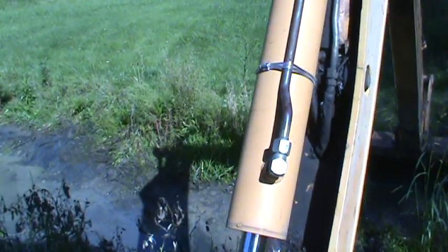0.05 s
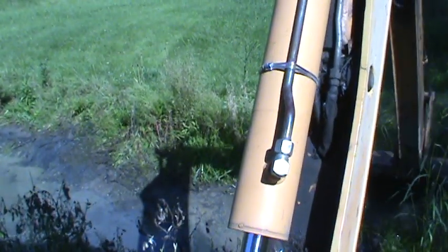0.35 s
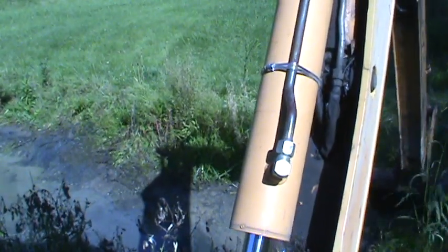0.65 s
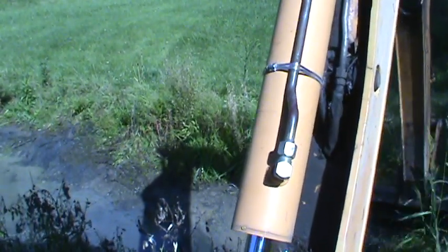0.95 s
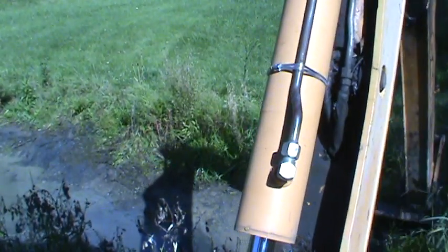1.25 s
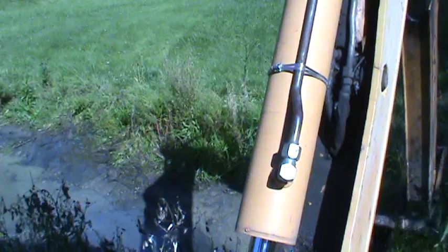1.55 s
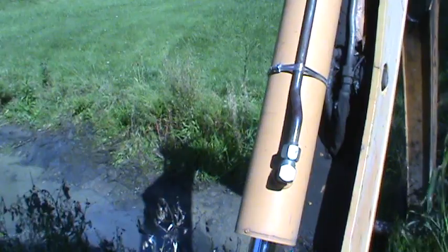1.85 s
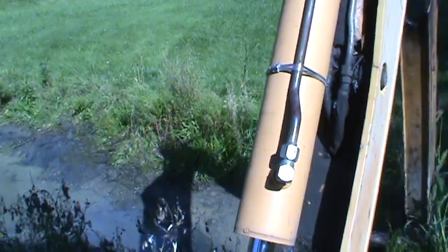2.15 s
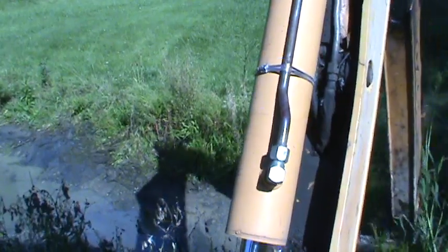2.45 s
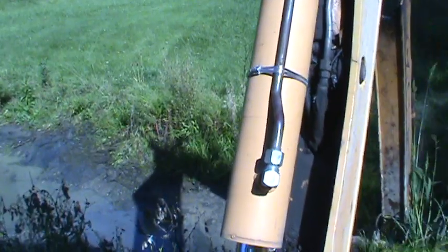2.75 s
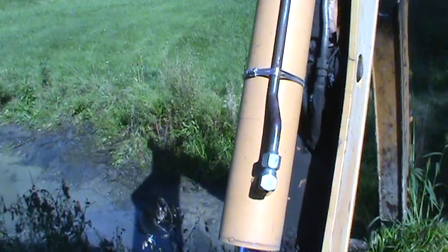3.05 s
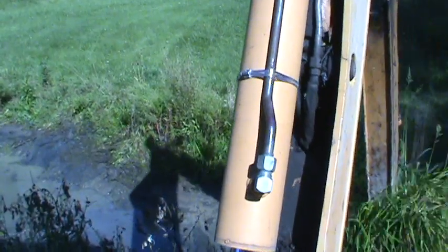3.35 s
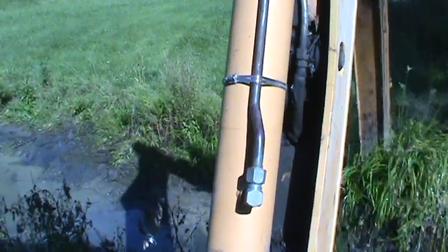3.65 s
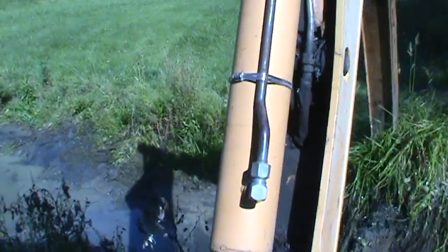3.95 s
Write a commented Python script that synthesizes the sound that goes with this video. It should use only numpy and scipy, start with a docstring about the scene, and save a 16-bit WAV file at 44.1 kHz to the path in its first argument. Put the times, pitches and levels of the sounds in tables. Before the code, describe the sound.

Diesel digger engine throbbing and whining steadily while its arm clanks and scrapes through mud.

```python
"""A four-cylinder diesel throbs and clatters, heard from the seat of a backhoe working a muddy ditch.
Each firing puffs and knocks; the engine turns whirring gears and an oil pump whose teeth whine.
Slack joints in the digging arm clank, a pivot squeals, wet mud drops and wind nudges the microphone.
Near the end the engine labours while oil rushes through a valve and the bucket tears grass."""
import sys
import numpy as np
from scipy import signal
from scipy.fft import rfft, irfft
from scipy.io import wavfile
from scipy.ndimage import map_coordinates

SR = 44100
rng = np.random.default_rng(int(sys.argv[2]) if len(sys.argv) > 2 else 0)


def to_wav(sig):
    """Store sig (one row per channel, or 1-D mono) as 16-bit WAV at the path in sys.argv[1].

    Samples outside -1..1 are clipped; the rate is SR.
    """
    pcm = np.clip(np.atleast_2d(sig), -1, 1) * 32767
    pcm = np.round(pcm).astype(np.int16)
    wavfile.write(sys.argv[1], SR, pcm.T)  # frames by channels


N = 176400

# Levels are relative. A SPECTRUM says how strong a noise is at each frequency: f/Hz, level/dB.
# wind buffets: peak t/s, half length/s, level/dB
GUSTS = [(0.325, .08, -25), (2.36, 0.14, -29), (3.37, .08, -26)]
WIND_SPECTRUM = [(12, -50), (22, -14), (30, 2), (37, 5), (50, -19), (400, -72)]
# the bucket tearing grass: peak t/s, half length/s, level/dB
TEARS = [(.31, 0.057, -39), (3.62, 0.074, -31), (3.82, 0.41, -32.5)]
GRASS_SPECTRUM = [(2500, -16), (6000, 5), (15000, -6)]
# wet spatters and (second row) the bright crack of a clank: t/s, level/dB, decay/s
SPATTERS_AND_CRACK = [(.123, -28.5, 0.0089), (.193, -20.5, 0.0062), (2.14, -33.5, 0.027),
                      (3.058, -26.5, 0.021), (3.087, -24.5, 0.028), (3.175, -26, 0.057), (3.415, -25, 0.01),
                      (3.467, -26, 0.029)]
SPATTER_AND_CRACK_SPECTRUM = [(1000, -5), (2800, 7.5), (5000, 5.5), (9000, 2), (12000, -1.5), (15500, -12)]
# the bucket scraping stony mud: peak t/s, half length/s, level/dB
SCRAPES = [(.24, 0.062, -25), (3.27, 0.24, -28)]
SCRAPE_SPECTRUM = [(400, -14.5), (900, -1), (1600, -9), (2300, -3), (3200, -11.5), (6000, -30),
                   (14000, -35)]
# a heavy clod landing: t/s, level/dB, decay/s
THUDS = [(2.185, -15.5, 0.12)]
THUD_SPECTRUM = [(200, -19), (360, -11), (440, 6), (520, -7), (700, -19), (9000, -78)]
# lumps falling into water: t/s, starting f/Hz, level/dB, decay/s
PLOPS = [(2.183, 1300, -17, 0.011), (2.849, 2170, -16, 0.0064), (3.147, 3370, -22, 0.014),
         (3.229, 1560, -20.5, .016), (3.457, 2374, -20, 0.0095)]
# loose fittings: t/s, f/Hz, level/dB, decay/s
PINGS = [(0.035, 2780, -27, .03), (.048, 5200, -33, 0.022), (.805, 12600, -33, 0.0028)]
# clanks of the boom (the digging arm): t/s, level/dB, decay/s
CLANKS = [(.13, -18, 0.019), (.1945, -14.5, 0.013), (.207, -19, 0.022), (.2324, -19, 0.007),
          (.258, -21, 0.022), (3.322, -19, 0.015), (3.457, -32, 0.013)]
CLANK_SPECTRUM = [(200, 3.5), (700, 11), (1400, -3), (2300, -7.5), (3500, -7), (5000, -12), (9800, -18.5),
                  (12000, -42)]
# notes at which the boom's steel rings: f/Hz, level/dB
BOOM_NOTES = [(1430, 3), (1800, -5), (2300, 0), (2480, -6), (2900, -4), (4190, -9), (5020, -10),
              (7740, -10), (9780, -13)]
# squeals and whistles: t/s, length/s, first f/Hz, last f/Hz, level/dB, octave/dB, roughness/share of f
SQUEALS = [(1.508, 0.077, 5200, 5190, -37, -14, 0.0068), (1.583, 0.036, 5200, 5310, -26.5, -15, 0.011),
           (1.603, 0.063, 5350, 5330, -35, 2.5, 0.002), (1.647, 0.048, 5390, 5345, -33.5, -12, 0.013),
           (1.63, 0.044, 5950, 5930, -39, -22, .014), (1.754, .04, 5100, 5060, -41, -10, .012),
           (3.313, 0.07, 5600, 5580, -33.5, -20, 0.0057), (3.341, 0.072, 2230, 2216, -36, -26, 0.0087),
           (3.385, 0.07, 6470, 6550, -34.5, -15, 0.0125), (3.538, 0.14, 7590, 7480, -35, -24, 0.015),
           (3.687, 0.1, 9700, 9600, -35, -30, .03)]
# extra hiss as oil flows to the ram that moves the arm: peak t/s, half length/s, level/dB
OIL_FLOW = [(1.8, 0.68, -42)]
HISS_SPECTRUM = [(1500, -4), (3400, -9), (4300, 0), (4900, -7.5), (6000, -4.5), (7300, -14), (8400, -3.5),
                 (9300, -17), (12000, -24), (15500, -49)]
# oil rushing through the control valve: t/s, level/dB
RUSH_LEVEL = [(0, -30), (.3, -35.5), (.55, -32), (.7, -57), (2.4, -43.5), (2.65, -33.5), (3.2, -29),
              (3.53, -31), (3.62, -22.5), (3.8, -25), (4, -26)]
RUSH_SPECTRUM = [(1500, 2), (3200, -5), (4400, 1.5), (6800, -2.5), (7800, -0.5), (9600, -6), (11000, -11.5),
                 (13300, -12), (15600, -28)]
# pump whine and its octave (twice the frequency): t/s, level/dB
WHINE_LEVEL = [(0.0, -36), (0.11, -21), (0.27, -41), (0.34, -21), (0.78, -20), (1.3, -27.5), (1.54, -26),
               (1.8, -21), (1.89, -42), (2.46, -21), (2.53, -27), (2.87, -20), (3.02, -39), (3.07, -24),
               (3.59, -20.5), (3.65, -26.5), (3.94, -23), (4.0, -30)]
WHINE_OCTAVE_LEVEL = [(0.0, -31), (0.41, -17.5), (1.24, -16), (1.49, -19.5), (1.54, -16), (1.67, -20),
                      (2.37, -16), (3.13, -19), (3.36, -31.5), (3.4, -19), (3.7, -25.5), (3.88, -19.5),
                      (4.0, -22.5)]
# timing gears, ringing engine block and covers, engine rumble: f/Hz, level/dB
GEAR_SPECTRUM = [(700, -7), (1050, -9), (1500, 3.5), (2700, 0), (3100, 2), (3550, -6), (4150, -1),
                 (4450, -28), (4800, -10), (6000, -21), (9000, -27)]
BLOCK_SPECTRUM = [(200, -19), (450, 1.5), (740, -2), (830, -9), (890, -1), (980, 2), (1200, -1.5),
                  (1700, -17), (2400, -11), (3400, -22.5), (4400, -20.5), (7000, -19), (15000, -48)]
RUMBLE_SPECTRUM = [(20, -12), (34, -3), (48, -12), (72, -10.5), (100, -3.5), (160, -2.5), (230, 1.5),
                   (340, -4), (450, -2), (620, -8), (900, -12), (1400, -17), (3000, -27.5), (8000, -46.5)]
# how often the engine fires: t/s, f/Hz
FIRING_RATE = [(0.0, 56.64), (0.18, 54.5), (0.3, 55.82), (1.11, 55.61), (1.4, 55.11), (2.21, 55.38),
               (3.01, 55.07), (3.24, 54.46), (3.35, 53.03), (3.51, 52.36), (3.64, 53.14), (3.84, 55.3),
               (4.0, 54.95)]
# exhaust throb and its octave: t/s, level/dB
THROB_LEVEL = [(0.0, -34), (1.82, -25.5), (3.23, -28), (3.5, -32), (3.94, -29)]
THROB_OCTAVE_LEVEL = [(0, -19.5), (.25, -24), (1.2, -24.5), (2, -29), (4, -27.5)]
# shaft, fan and gear tones, and the pump whine's beating overtone (the three rows near 15):
# multiple of the firing rate, level/dB, left over right/dB
MACHINE_TONES = [(2.988, -38.5, -8), (3.822, -30, -5.5), (4.017, -38, 1), (14.87, -34.5, 1.5),
                 (15.066, -36, 0), (15.46, -38, 0), (16.67, -38.5, -1), (17.9, -38, 3), (18.99, -42, 4),
                 (20.45, -42, 7.5), (80, -47.5, -2)]
# how far the left microphone opening is ahead (negative: behind): f/Hz, lead/rad
LEFT_LEAD = [(0, -0.74), (110, -1.05), (290, -1.27), (600, -0.59), (2500, -0.2)]


def undb(db):
    """Turn decibels into a gain."""
    return 10 ** (np.asarray(db) / 20)


def unit(x):
    """Scale to an average power of 1."""
    return x / np.sqrt(np.mean(x ** 2))


def clock():
    """The time of each sample in seconds."""
    return np.arange(N) / SR


def curve(rows):
    """Join (time, value) rows with straight lines."""
    return np.interp(clock(), *np.array(rows)[:, :2].T)


def wander(rate_hz):
    """A smooth random wobble of typical size 1, mostly slower than rate_hz."""
    f = np.arange(N // 2 + 1) * SR / N
    return unit(irfft(rfft(rng.standard_normal(N)) / (1 + (f / rate_hz) ** 4), N))


def ring_through(x, ring):
    """Let every sample of x set off a ring; white noise keeps its power."""
    return signal.fftconvolve(x, (ring / np.linalg.norm(ring))[None], axes=-1)[:, :N]


def colour(x, spectrum):
    """Filter x to the shape of a spectrum."""
    hz, db = np.array(spectrum).T
    size = 8192
    f = np.maximum(np.arange(size // 2 + 1) * SR / size, 1)
    gain = undb(np.interp(np.log(f), np.log(hz), db))
    cepstrum = irfft(np.log(gain))
    cepstrum[1:size // 2] *= 2  # fold it so the filter rings only after a hit, never before
    cepstrum[size // 2 + 1:] = 0
    return ring_through(x, irfft(np.exp(rfft(cepstrum))))


def pan(db):
    """Two gains that make the left db louder than the right."""
    return undb(np.array([[db], [-db]]) / 2)


def noise(width_db):
    """White stereo noise; lower width_db makes the sides more alike."""
    mid, side = rng.standard_normal((2, N))
    return mid + undb(width_db) * np.array([side, -side])


def tone(phase, pan_db=0, lead=0):
    """A pure stereo tone whose left side is lead radians ahead."""
    return np.sqrt(2) * np.sin(phase + np.array([[lead], [-lead]]) / 2) * pan(pan_db)


def bursts(rows, attack_s):
    """Loudness outline of blows that rise fast and die away."""
    t, out = clock(), 0
    for start, db, decay in rows:
        rise = np.clip((t - start) / attack_s, 0, 1)
        out += undb(db) * rise * np.exp(-np.maximum(t - start - attack_s, 0) / decay)
    return out


def swells(rows):
    """Loudness outline of smooth, bell-shaped swells."""
    return sum(undb(db) * np.exp(-((clock() - peak) / half) ** 2) for peak, half, db in rows)


def microphone(x):
    """Sound reaches the right microphone opening just before the left."""
    lead = np.interp(np.arange(N // 2 + 1) * SR / N, *np.array(LEFT_LEAD).T)
    return irfft(rfft(x) * np.exp(.5j * np.array([lead, -lead])), N)


def wind():
    """Gusts bump the microphone with a soft, low rumble."""
    return swells(GUSTS) * colour(noise(width_db=-18), WIND_SPECTRUM)


def grass(snaps_per_s=2000):
    """Stalks snap in quick clusters as the bucket tears through the bank."""
    snaps = rng.standard_normal((2, N)) * (rng.random(N) < snaps_per_s / SR)
    clusters = undb(3 * wander(200))
    return swells(TEARS) * colour(unit(snaps * clusters), GRASS_SPECTRUM)


def digging():
    """Wet spatters and the bright crack of a clank; the bucket scrapes stony mud and a clod thuds."""
    grains = noise(width_db=-13) * bursts(SPATTERS_AND_CRACK, attack_s=0.005) * undb(4.3 * wander(940))
    scrape = noise(width_db=-18) * swells(SCRAPES) * unit(undb(3.8 * wander(270)))
    thud = noise(width_db=-6) * bursts(THUDS, attack_s=0.0038)
    return (colour(grains, SPATTER_AND_CRACK_SPECTRUM) + colour(scrape, SCRAPE_SPECTRUM)
            + colour(thud, THUD_SPECTRUM))


def plops():
    """Lumps hit the water, each with a short, rough note that rises a little."""
    wobble, out = 0.0794 * wander(581), 0
    for start, hz, db, decay in PLOPS:
        glide = 0.017 * np.clip((clock() - start) / decay, 0, 2)
        phase = 2 * np.pi * np.cumsum(hz * (1 + wobble + glide)) / SR
        out += bursts([(start, db, decay)], attack_s=0.0011) * tone(phase, pan_db=-1, lead=-0.33)
    return out


def fittings():
    """Loose steel fittings chatter, each around one note."""
    shaky_time = np.cumsum(1 + 0.044 * wander(350)) / SR
    return sum(bursts([(start, db, decay)], attack_s=0.00086) * tone(2 * np.pi * hz * shaky_time)
               for start, hz, db, decay in PINGS)


def boom(ring_s=0.032, ring_db=-6.5):
    """Slack joints clank: the rough contact makes the steel ring briefly."""
    contact = noise(width_db=-11) * bursts(CLANKS, attack_s=0.0019) * undb(2.6 * wander(450))
    t = clock()[:SR // 4]
    ring = sum(undb(db - 60 * t / ring_s) * np.sin(2 * np.pi * hz * t) for hz, db in BOOM_NOTES)
    return colour(contact, CLANK_SPECTRUM) + undb(ring_db) * ring_through(contact, ring)


def squeals(fade_s=0.011):
    """A pivot squeals and a valve whistles: thin, rough tones, each with its octave."""
    t, out = clock(), 0
    wobble, flutter = wander(445), undb(2 * wander(110))
    for start, length, first_hz, last_hz, db, octave_db, roughness in SQUEALS:
        pitch = np.interp(t, [start, start + length / 2], [first_hz, last_hz])
        phase = 2 * np.pi * np.cumsum(pitch * (1 + roughness * wobble)) / SR
        fade = np.clip(np.minimum(t - start, start + length - t) / fade_s, 0, 1)
        octave = undb(octave_db) * tone(2 * phase, pan_db=.8, lead=-0.52)
        out += undb(db) * fade * (tone(phase, pan_db=7, lead=0.3) + octave)
    return out * flutter


def oil(firing, hiss_db=-36):
    """Oil hisses in the lines, pulsing with the engine, and rushes through the opening valve."""
    pulse = undb(0.38 * np.cos(firing) + 0.56 * wander(61))
    hiss = (undb(hiss_db) + swells(OIL_FLOW)) * colour(noise(width_db=-10.5) * pulse, HISS_SPECTRUM)
    rush = undb(curve(RUSH_LEVEL) + 1.3 * wander(23)) * colour(noise(width_db=-9.5), RUSH_SPECTRUM)
    return (hiss + rush) * pan(0.93)


def pump(firing):
    """The pump's teeth meet five times per firing; the whine rises and falls with the oil pressure."""
    teeth = 5 * firing + 0.016 * wander(30)
    whine = undb(curve(WHINE_LEVEL) + 1.87) * tone(teeth, pan_db=-1.5, lead=-1.09)
    octave = undb(curve(WHINE_OCTAVE_LEVEL) + 0.26) * tone(2 * teeth, pan_db=-1.8, lead=-0.22)
    return (whine + octave) * undb(.4 * wander(18))


def gears(firing, level_db=-37):
    """The same uneven timing-gear teeth meet on every shaft turn, so the whirr repeats."""
    turn = firing / (4 * np.pi) % 1  # two firings per turn
    turn_samples = int(2 * SR / np.mean(curve(FIRING_RATE)))
    teeth = noise(width_db=-7)[:, :turn_samples]
    whirr = np.array([map_coordinates(side, [turn * turn_samples], mode="grid-wrap") for side in teeth])
    return undb(level_db + 3.3 * wander(21)) * unit(colour(whirr, GEAR_SPECTRUM)) * pan(1.5)


def clatter(firing, level_db=-30, valve_db=3, jitter_s=.00015):
    """Four knocks of burning fuel alternate with four valve taps, each ringing the block its own way."""
    t, out = clock(), 0
    beats = firing / np.pi  # a knock and a tap per firing
    starts = np.interp(np.arange(int(beats[-1])), beats, t)
    jitter, scatter_db = rng.standard_normal((600, 2))[:len(starts)].T
    hit_samples = np.clip((starts + jitter_s * jitter) * SR, 0, N - 1).astype(int)
    decay = np.exp(-t / 0.0046) + 0.34 * np.exp(-t / 0.023)  # sharp click, longer tail
    for part in range(8):
        hits = np.zeros(N)
        hits[hit_samples[part::8]] = undb(scatter_db[part::8] + valve_db * (part % 2))
        ring = (noise(width_db=-13.5) * decay)[:, :SR // 10]
        out += signal.fftconvolve(hits[None], ring, axes=-1)[:, :N]
    return undb(level_db) * unit(colour(out, BLOCK_SPECTRUM))


def engine(firing, exhaust_db=-1.5, waver_db=3, rumble_db=-20.5):
    """Each firing throbs and rumbles; shaft, fan and gears hum, and the pump whine's overtone beats."""
    out = undb(curve(THROB_LEVEL) + exhaust_db) * tone(firing)
    lope = 1 + 0.19 * np.cos(firing / 4)  # one rise and fall over the four cylinders
    octave_db = curve(THROB_OCTAVE_LEVEL) + exhaust_db + 0.46 * wander(22)
    out += lope * undb(octave_db) * tone(2 * firing, pan_db=-2)
    sway = 0.21 * wander(4.7)
    for multiple, db, pan_db in MACHINE_TONES:
        out += undb(db + waver_db * wander(11.5)) * tone(multiple * firing + sway, pan_db)
    swell = 1 + 0.24 * np.cos(firing) + 0.085 * np.cos(firing / 2)
    rumble = colour(noise(width_db=-10) * swell, RUMBLE_SPECTRUM)
    return out + undb(rumble_db) * rumble * pan(-1.2)


def scene():
    """Mix the machine, whose parts share one engine speed, with the wind and the digging."""
    firing = 2 * np.pi * np.cumsum(curve(FIRING_RATE)) / SR  # an angle: one full circle per firing
    out = microphone(engine(firing) + clatter(firing) + gears(firing) + wind())
    out += pump(firing) + oil(firing)
    return out + squeals() + boom() + fittings() + digging() + plops() + grass()


def record(dry, top_hz=15750):
    """Cut off the treble above top_hz."""
    return signal.sosfilt(signal.ellip(10, .2, 80, top_hz, fs=SR, output="sos"), dry)


dry = scene()
out = record(dry)
to_wav(out)
```